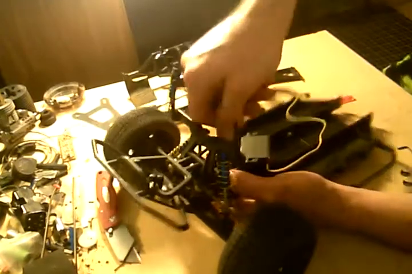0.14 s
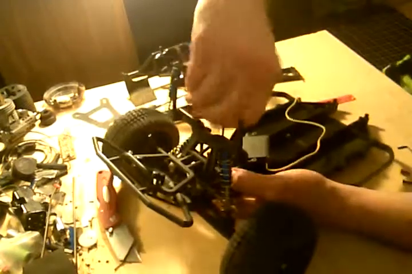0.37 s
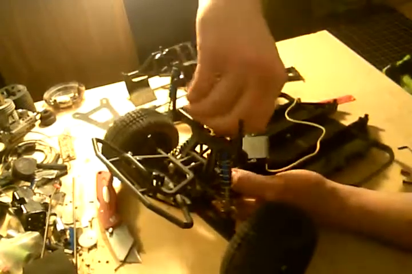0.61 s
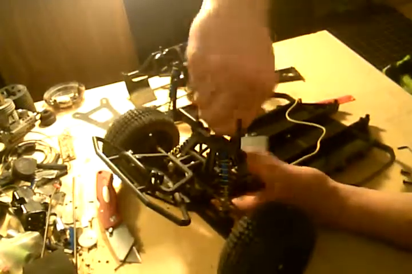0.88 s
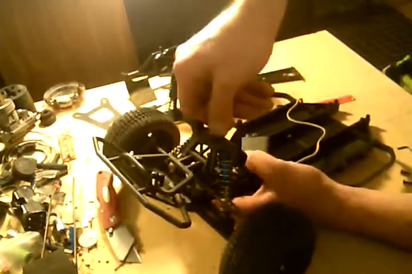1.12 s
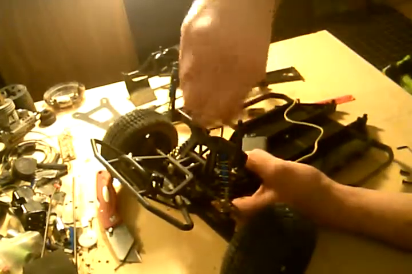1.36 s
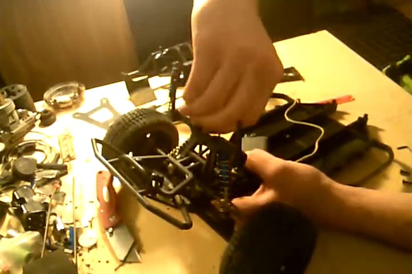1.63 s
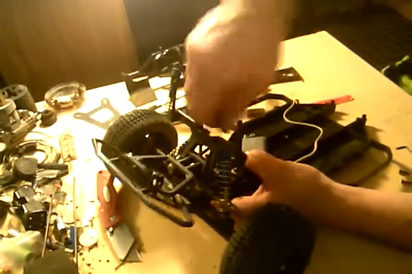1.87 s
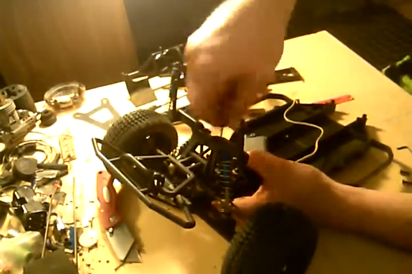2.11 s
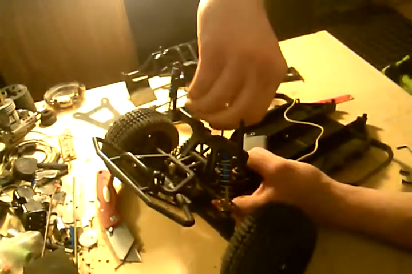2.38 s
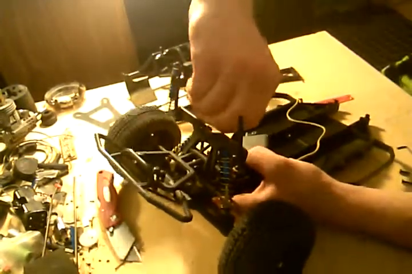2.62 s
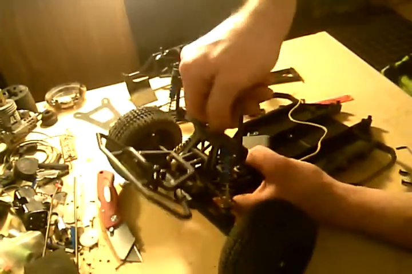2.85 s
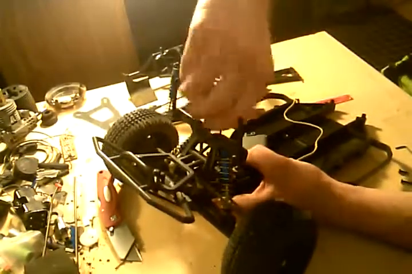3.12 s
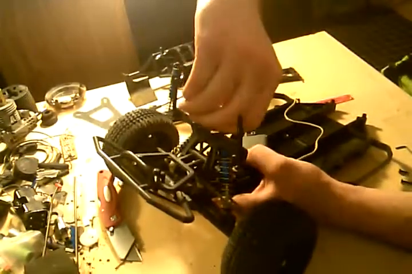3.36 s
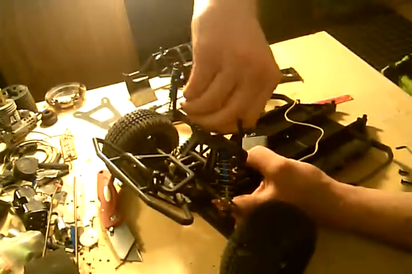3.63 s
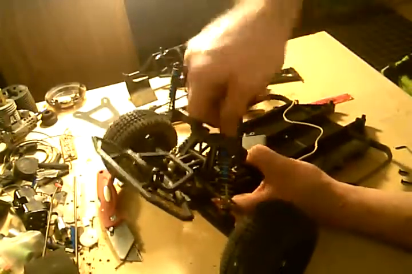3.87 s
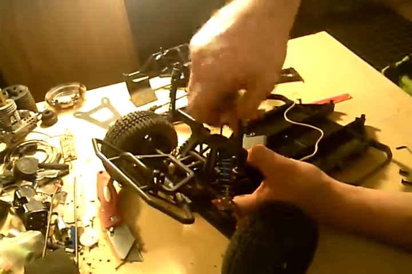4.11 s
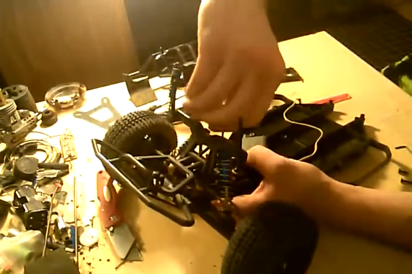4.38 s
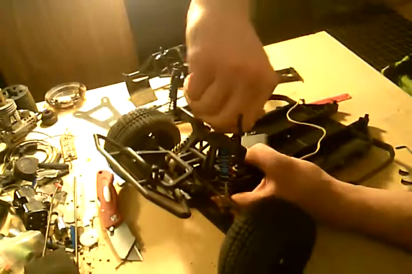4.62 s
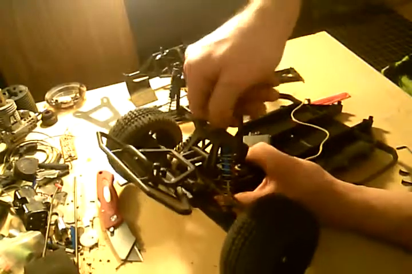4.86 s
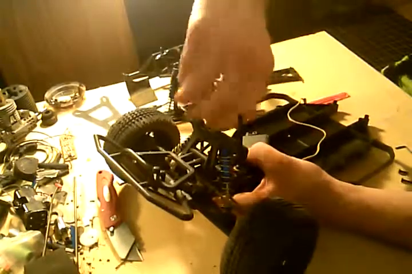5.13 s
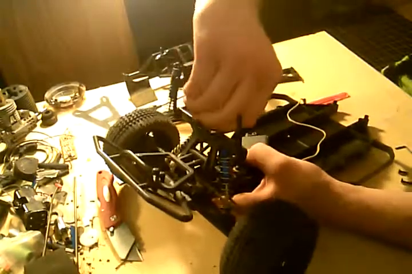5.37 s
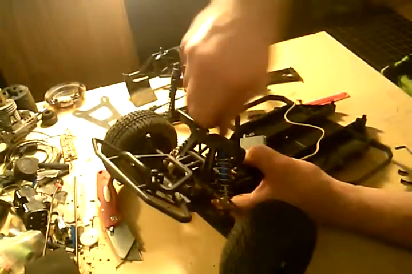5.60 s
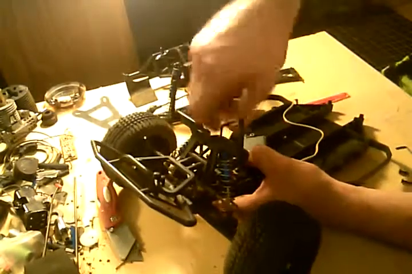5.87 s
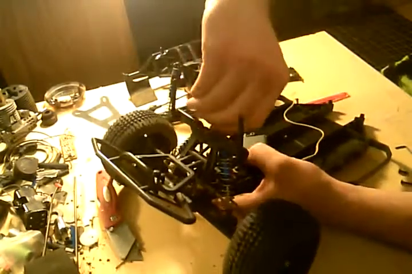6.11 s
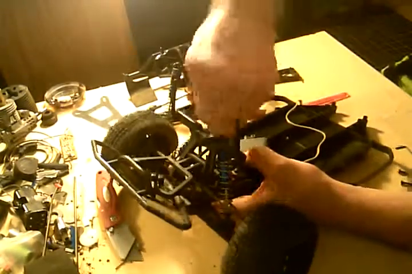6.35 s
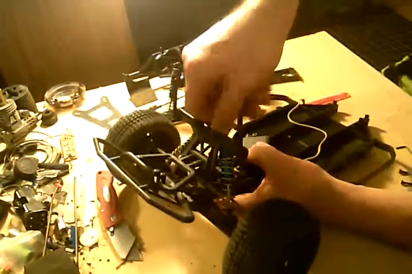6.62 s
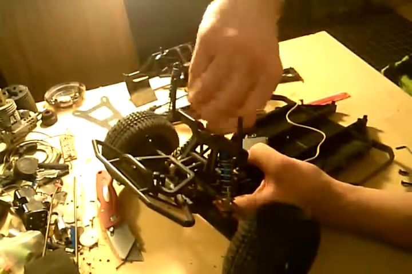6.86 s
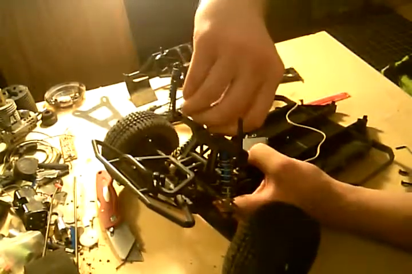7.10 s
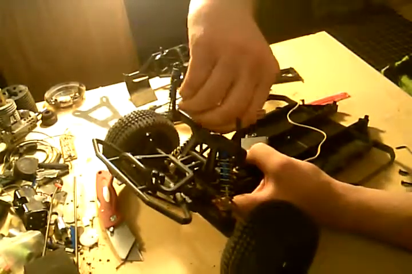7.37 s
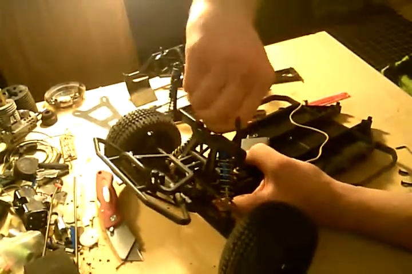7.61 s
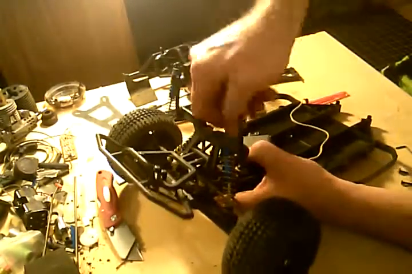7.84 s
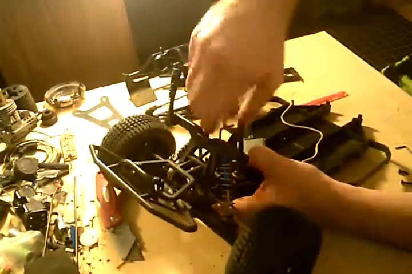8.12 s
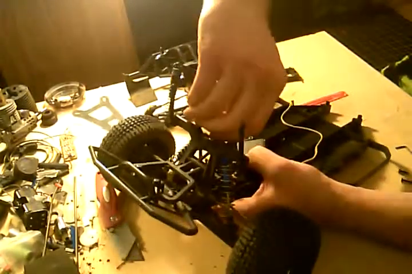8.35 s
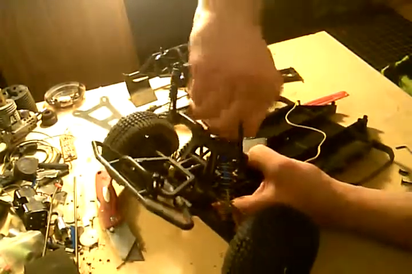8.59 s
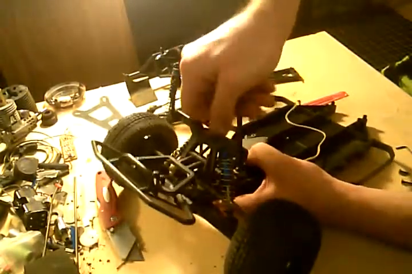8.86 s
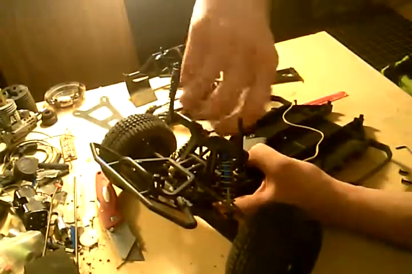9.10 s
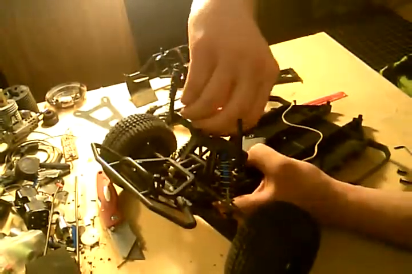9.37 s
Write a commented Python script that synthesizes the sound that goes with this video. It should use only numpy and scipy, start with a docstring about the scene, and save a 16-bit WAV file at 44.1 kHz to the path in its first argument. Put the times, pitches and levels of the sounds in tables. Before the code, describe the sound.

Close indoor sound of a screw being driven into a plastic chassis on a wooden bench. Soft contacts at the start lead to a loud hard clack at 0.27 s with a quick rattle. A small snap follows at 0.9, then a sharp bright one at 1.8, with hollow knocks near 2.0 and 2.15. More snaps and clacks fall around 2.65 and 2.9-3.0. Strong snaps come at 3.8, 4.7, 5.6, 6.3, 7.6 and 8.6 s, most followed by a brief dry stick-slip creak, clearest at 5.6, 7.8 and 8.7. Between them come regrip ticks, plastic rattles, shuffling and faint skin rustle, with low bench thumps near 4.1, 6.5 and 8.8. Barely audible squeaks pass by. A dense clatter occurs at 7.7-8.2. After 9 s only small clicks remain. The room tail is short; faint hiss drops in the pauses.

```python
"""Screwdriver in a plastic chassis

A hand turns a screwdriver into the plastic chassis of a model car on a wooden bench in a small room.
Snaps, knocks and ticks ring modes of chassis, tip and bench; stick-slip trains make the creak and shuffle.
Narrow resonances squeak, bright grains rustle as fingers slide, and pressing hands hum and sway the bench.
The microphone is close, on a stand; its noise gate turns the hiss down between moves."""
import sys
import numpy as np
from scipy import signal
from scipy.fft import rfft, irfft
from scipy.io import wavfile
from scipy.ndimage import uniform_filter1d

SR = 44100
rng = np.random.default_rng(int(sys.argv[2]) if len(sys.argv) > 2 else 0)


def voltage_ratio(decibels):
    """Convert decibels (scalar or array-like) to amplitude ratios, 20 dB per decade."""
    exponent = np.asarray(decibels, float) / 20
    return 10 ** exponent


def transcribe(u):
    """Save the signal u as a 16-bit wav file named by the first command-line argument.

    u: samples, shape (n,) or (channels, n), limited to [-1, 1]; the rate is SR.
    q: integer samples, one column per channel.
    """
    v = np.clip(np.atleast_2d(u).T, -1, 1)
    q = np.round(v * 32767).astype(np.int16)
    wavfile.write(sys.argv[1], SR, q)


N = 418068


def rms_one(x):
    """Scale to rms 1."""
    return x / np.sqrt(np.mean(x ** 2) + 1e-20)


def at_hz(points, hz):
    """Read a (Hz, value) table on a log-frequency axis."""
    table_hz, value = np.transpose(points)
    return np.interp(np.log(hz), np.log(table_hz), value)


def colour(x, spectrum):
    """Shape a steady noise by a spectrum in dB."""
    hz = np.maximum(np.fft.rfftfreq(len(x), 1 / SR), 1)
    return irfft(rfft(x) * voltage_ratio(at_hz(spectrum, hz)), len(x))


def resonate(x, hz, width_hz):
    """Two-pole resonance; a unit click rings with height about 1."""
    radius = np.exp(-np.pi * width_hz / SR)
    angle = 2 * np.pi * hz / SR
    return signal.lfilter([0, np.sin(angle)], [1, -2 * radius * np.cos(angle), radius ** 2], x + 1e-18)


def body(x, modes):
    """All modes of one object in parallel, signs alternating."""
    return sum((-1) ** k * voltage_ratio(db) * resonate(x, hz, width) for k, (hz, width, db) in enumerate(modes))


def swell(t, start, end, ramp_s):
    """Straight rise to 1 and fall back to 0 inside one event."""
    return np.clip(np.minimum(t - start, end - t) / ramp_s, 0, 1)


def strike(s, modes, peak_db, tilt_db, knee_hz, crest_db, rise_s, contact_s, spread_db):
    """Each knock is a chatter of contacts that drives every mode with a strength of its own."""
    t = np.arange(8192) / SR
    shape = (len(s), len(t))
    chatter = rng.standard_normal(shape) * voltage_ratio(5.4 * rng.standard_normal(shape))
    hardest_first = np.exp(-t / contact_s) + 1.3 * np.exp(-t / (3 * rise_s))
    chatter *= hardest_first * -np.expm1(-t / rise_s)
    # hard blows are short and leave the lowest modes weaker (dB per octave)
    thin_db = 0.3 * np.maximum(peak_db + 33.5, 0)
    luck_db = rng.normal(0, spread_db, (len(s), len(modes)))
    rings = np.zeros(shape)
    for k, (hz, width, db) in enumerate(modes):
        octaves = np.log2(hz / knee_hz)
        mode_db = db + luck_db[:, k] + tilt_db * max(octaves, 0) + thin_db * min(octaves + 0.5, 0)
        rings += (-1) ** k * voltage_ratio(mode_db)[:, None] * resonate(chatter, hz, width)
    loudest = np.sqrt(uniform_filter1d(rings ** 2, size=200, axis=1).max(axis=1))  # over about 5 ms
    rings *= (voltage_ratio(peak_db - crest_db) / loudest)[:, None]
    at = (s[:, None] * SR).astype(int) + np.arange(len(t))
    return np.bincount(at.ravel(), rings.ravel(), N + len(t))[:N]


# The tip snaps into the screw head.
# Each row: start in seconds, then peaks in dB of tip, chassis and bench.
SNAP_EVENTS = [(0.911, -18.5, -38, -27), (0.926, -28, -24.5, -30.5), (1.827, -11.5, -22.5, -17.5),
               (2.635, -18, -27, -24), (3.775, -7.5, -28, -19), (4.666, -8.5, -22.5, -20.5),
               (4.887, -31.5, -38, -39), (4.943, -27, -25.5, -29.5), (5.013, -41, -42, -46),
               (5.579, -8.5, -24, -21), (5.944, -35, -36, -30), (6.328, -7, -21, -26.5),
               (6.514, -26.5, -31, -37), (6.559, -24, -16, -31), (7.593, -7.5, -25, -20),
               (7.638, -22.5, -26.5, -20.5), (7.703, -18, -22.5, -21), (8.637, -5.5, -19.5, -23.5),
               (8.839, -34, -26.5, -37), (9.256, -31, -46.5, -51)]
# Parts knock together. Each row: start in seconds, chassis peak in dB,
# slope of the upper chassis modes in dB per octave, tip peak in dB, bench peak in dB.
KNOCK_EVENTS = [(0.065, -41.5, 7.5, -61, -33.5), (.15, -42, 1, -38, -42.5), (.271, -4, 5, -12, -14),
                (.296, -14, -2, -37, -23), (.31, -21, -3.5, -24, -21.5), (1.004, -39.5, -18, -58, -40.5),
                (1.058, -29.5, -6, -32, -30.5), (1.281, -38, -33, -71, -49),
                (1.355, -39.5, -18, -49, -41.5), (1.583, -51.5, -27, -68.5, -46),
                (1.721, -63, 3.5, -58, -47.5), (1.973, -13, -0.5, -29.5, -25), (2.147, -18, -2, -34.5, -25),
                (2.23, -40, 18, -43, -43), (2.517, -70.5, -5, -71, -40), (2.655, -18.5, -0.5, -31, -29),
                (2.893, -30, -16, -32, -23.5), (2.909, -18, -4, -26.5, -22.5),
                (2.983, -15, -10.5, -38, -23), (3.072, -22, -3, -64, -30.5),
                (3.738, -28.5, -15.5, -61, -33.5), (3.792, -15, -20, -30, -21.5),
                (3.981, -26.5, -41, -58, -34), (4.03, -32, 6, -53, -32), (4.044, -15.5, -3, -55, -25.5),
                (4.129, -18, -7, -32.5, -17.5), (4.218, -39.5, 11.5, -43.5, -48),
                (4.573, -55.5, 1.5, -71.5, -37), (4.78, -24, -24, -39.5, -33),
                (4.861, -14.5, -9.5, -41, -22.5), (5.065, -37, -21, -49, -39),
                (5.147, -50.5, -16, -64.5, -47.5), (5.688, -23, -17, -32.5, -24.5),
                (5.737, -13, -3.8, -28.5, -27), (5.788, -29, -3, -55, -30.5), (5.871, -25.5, -13, -55, -41),
                (5.95, -22.5, 3, -46, -27), (6.06, -44, -19, -68, -51), (6.153, -33.5, -18, -80, -37),
                (6.49, -26.5, -26, -56, -20.5), (6.536, -21.5, -11, -29.5, -18.5),
                (6.64, -33.5, 1, -41, -26), (6.86, -40.5, -29, -60, -22), (7.211, -42, -17, -61.5, -40.5),
                (7.265, -28.5, -8.5, -63, -39), (7.309, -32.5, -11, -62, -32.5),
                (7.515, -49.5, -10, -67, -61), (7.731, -29, 4.5, -24, -29), (7.756, -23, -1, -25, -22.5),
                (7.777, -25, -3, -30, -46), (7.795, -22, 11, -29, -28), (7.812, -23, 10.5, -24, -28),
                (7.954, -25.5, -21, -60, -31), (8.045, -18.5, -1.5, -62, -38),
                (8.145, -29.5, -29, -58, -24), (8.174, -29.5, -3, -34, -20), (8.198, -21.5, 2, -42, -34),
                (8.209, -14.5, 5.5, -31, -25), (8.537, -50.5, -12, -74, -56),
                (8.591, -28.5, -3.5, -54, -34), (8.607, -27.5, -3, -45, -39.5),
                (8.787, -21.5, -39, -60, -17.5), (8.863, -47, 13, -43, -53), (8.905, -34, -25, -49, -37),
                (8.949, -51, -11, -52, -56), (9.055, -47.5, -14.5, -61, -39),
                (9.145, -53, -24, -65.5, -49.5), (9.301, -52, 6.5, -38.5, -61.5)]
# Thin bright ticks as the fingers leave and catch the handle. Each row: start in seconds, tip peak in dB.
TICK_EVENTS = [(.128, -49), (1.081, -44), (1.946, -42), (2.179, -36.5), (2.808, -40.5), (2.982, -34),
               (3.945, -40), (4.145, -34), (4.824, -36.5), (5.72, -32.5), (6.846, -44), (8.09, -39),
               (8.789, -49), (8.823, -34)]
# Modes of the plastic chassis. Each row: frequency in Hz, width in Hz, level in dB.
CHASSIS_MODES = [(399.6, 69, -1.5), (479.4, 40, 1), (633, 47, -2), (641.3, 37, -1.5), (850, 21, -3),
                 (856, 36, -4.5), (1015, 54, 3), (1037, 38, -3.5), (1155, 67, 1.5), (1342.4, 76, -3),
                 (1383, 82, -0.5), (1437, 260, 1), (1663, 94, -5), (1795, 100, 0), (1930, 750, -1.5),
                 (2085, 310, -4.5), (2363, 250, 4), (2527, 150, -2.5), (2680, 180, -4), (2833, 280, 3),
                 (3800, 800, -8), (4100, 2100, -21)]
# Well damped modes of the tip gripped in the screw head. Each row: frequency in Hz, width in Hz, level in dB.
TIP_MODES = [(1150, 300, -12.5), (2257, 900, -8), (3404, 220, -8.5), (4160, 480, -1), (4580, 550, 0.5),
             (4700, 990, -4), (4780, 400, -6.5), (5700, 1100, -0.5), (7040, 910, 0), (8070, 1000, 0),
             (9500, 1400, 1.5), (10000, 900, -1.5), (12230, 890, -4.5), (14400, 1300, -18.5)]
# Modes of the wooden bench top. Each row: frequency in Hz, width in Hz, level in dB.
BENCH_MODES = [(120, 12, -5.5), (162.35, 11, 7.5), (205, 13, -7), (247.4, 19, -4)]


def knocks():
    """Chassis, tip and bench top ring together at every snap, knock and tick."""
    # upper modes rise or fall by the given slopes (dB per octave)
    rows = [(s, chassis, -3.5, tip, -2, top) for s, tip, chassis, top in SNAP_EVENTS]
    rows += [(s, chassis, slope, tip, -14, top) for s, chassis, slope, tip, top in KNOCK_EVENTS]
    rows += [(s, db - 1, -14, db, 11.5, db + 0.5) for s, db in TICK_EVENTS]
    s, chassis_db, chassis_slope, tip_db, tip_slope, bench_db = np.transpose(rows)
    chassis = strike(s, CHASSIS_MODES, chassis_db, chassis_slope, 1200,
                     crest_db=8, rise_s=0.0004, contact_s=0.005, spread_db=2)
    tip = strike(s, TIP_MODES, tip_db, tip_slope, 2800,
                 crest_db=10.5, rise_s=0.0015, contact_s=0.01, spread_db=0)
    top = strike(s, BENCH_MODES, bench_db, 0, 230,
                 crest_db=5.5, rise_s=0.00041, contact_s=0.0064, spread_db=5.5)
    return chassis, tip, top


def slips(per_s, uneven):
    """A stick-slip train: the rate wanders, each slip has its own size."""
    wobble = uneven * rms_one(uniform_filter1d(rng.standard_normal(N), size=600))
    cycles = np.cumsum(per_s * np.exp(wobble) / SR)
    train = np.diff(np.floor(cycles), prepend=0)
    return train * voltage_ratio(3 * rng.standard_normal(N))


# The screw turns under load after the tip has seated.
# Each row: start in seconds, end in seconds, creak level in dB, slips per second.
SCREW_TURNS = [(0.944, 1.044, -68, 170), (1.85, 1.947, -50.5, 170), (2.665, 2.781, -60.5, 170),
               (3.81, 3.962, -50.5, 170), (4.686, 4.788, -46, 150), (5.596, 5.73, -33.5, 170),
               (6.349, 6.472, -46, 170), (7.74, 7.93, -33, 92), (8.658, 8.792, -35.5, 170)]


def creak():
    """The thread sticks and slips while the screw turns; the chassis rings, the tip scrapes faintly."""
    t = np.arange(N) / SR
    gain, per_s = np.zeros(N), np.full(N, 100.)
    for start, end, db, rate in SCREW_TURNS:
        gain += voltage_ratio(db) * swell(t, start, end, 0.049)
        per_s[(t > start) & (t < end)] = rate
    force = slips(per_s, uneven=0.15) / np.sqrt(per_s)
    ring = rms_one(body(force, CHASSIS_MODES[6:9]))
    ring += voltage_ratio(-11) * rms_one(body(force, CHASSIS_MODES[9:]))
    ring += voltage_ratio(-15) * rms_one(body(force, TIP_MODES[1:9]))
    return gain * ring


def shuffle(shuffle_db, scrape_db):
    """Parts shift in the grip: small slips over steady rubbing ring the chassis and the tip."""
    force = slips(160, uneven=0.5)  # slips per second
    rub = rng.standard_normal(N)
    out = voltage_ratio(shuffle_db) * rms_one(body(force + 0.021 * rub, CHASSIS_MODES))
    return out + voltage_ratio(scrape_db) * rms_one(body(force + 0.12 * rub, TIP_MODES[:9]))


# Faint squeaks of plastic on plastic.
# Each row: start in seconds, end in seconds, pitch in Hz, level in dB.
PLASTIC_SQUEAKS = [(2.27, 2.44, 804, -70.5), (5.14, 5.25, 765, -63), (5.529, 5.575, 1055, -58),
                   (6.29, 6.325, 1047, -55.5)]


def squeaks():
    """Light rubbing excites one narrow resonance for a moment."""
    t, rub = np.arange(N) / SR, rng.standard_normal(N)
    out = np.zeros(N)
    for start, end, hz, db in PLASTIC_SQUEAKS:
        tone = rms_one(resonate(resonate(rub, hz, 45), hz, 45))
        out += voltage_ratio(db) * swell(t, start, end, 0.022) * tone
    return out


# Spectrum of skin sliding on the handle. Each row: frequency in Hz, relative level in dB.
RUSTLE_SPECTRUM = [(3000, -23), (5000, -19.5), (7000, -2), (10000, 0), (13000, -7.5), (15500, -12)]


def rustle(level_db):
    """Skin slides on the handle: fine bright grains."""
    grains = rng.standard_normal(N) * voltage_ratio(3 * np.minimum(rng.exponential(1, N), 5))
    return voltage_ratio(level_db) * rms_one(colour(grains, RUSTLE_SPECTRUM))


# Pushes of the hands into the bench. Each row: start in seconds, peak in dB, sway frequency in Hz.
BENCH_PUSHES = [(0.162, -26.5, 29.86), (.272, -26, 70.7), (0.951, -36.5, 27), (1.126, -37, 27.6),
                (1.851, -33.5, 40.9), (2.138, -48, 24), (2.144, -22, 34), (2.511, -40, 22.9),
                (2.9, -24.5, 32.4), (3.788, -33.5, 60.1), (4.129, -25.5, 23.5), (4.13, -20, 52.1),
                (4.677, -28, 26.9), (4.941, -27, 35), (5.59, -28, 24.2), (6.129, -33, 27.47),
                (6.319, -28.5, 29.6), (6.541, -20, 59), (6.919, -36.5, 25.6), (7.291, -30, 27.7),
                (7.632, -25, 24.6), (7.784, -57, 48.4), (8.066, -46, 59), (8.071, -24, 42),
                (8.647, -30.5, 24.4), (8.84, -21.5, 41.3), (9.131, -41, 27.7)]


def bench(hum_db, sway_db):
    """Hand pressure shakes the bench top and rocks the legs; pushes set off a damped sway."""
    top_shake, leg_shake = rng.standard_normal((2, N))
    out = voltage_ratio(hum_db) * rms_one(body(top_shake, BENCH_MODES))
    out += voltage_ratio(sway_db) * rms_one(resonate(leg_shake, 34, 20) + 1.8 * resonate(leg_shake, 85, 60))
    t = np.arange(SR // 2) / SR
    sides = rng.choice([-1, 1], len(BENCH_PUSHES))
    for (s, db, hz), side in zip(BENCH_PUSHES, sides):
        at = int(s * SR)
        sway = np.sin(2 * np.pi * hz * t) * np.exp(-t / 0.032) * -np.expm1(-t / 0.0082)
        out[at:at + len(t)] += (side * voltage_ratio(db + 8.5) * sway)[:N - at]  # 8.5 dB makes up for the envelope
    return out


# Moves of the hands. Each row: start in seconds, end in seconds, then levels in dB of
# shuffle, bench hum and finger slide.
HAND_MOVES = [(0.064, 0.142, -54.5, -56, -66), (0.164, 0.184, -52.5, -50, -52), (.2, .27, -58, -61, -65.5),
              (0.728, .9, -81, -72.5, -89), (0.986, 1.202, -62, -58, -66), (1.293, 1.37, -64, -70.5, -73),
              (1.582, 1.623, -75.5, -71, -87.5), (1.737, 1.819, -71.5, -61.5, -82),
              (1.87, 2.052, -60.5, -42, -68.5), (2.12, 2.312, -60, -49.5, -67.5),
              (2.639, 2.832, -65, -51.5, -62), (2.884, 3.038, -55.5, -52.5, -64),
              (3.257, 3.419, -81, -70.5, -83.5), (3.852, 3.99, -57.5, -38, -67),
              (4.003, 4.203, -55.5, -43.5, -69), (4.56, 4.66, -63, -67, -75),
              (4.697, 4.86, -52.5, -37, -61), (4.901, 5.071, -58.5, -51, -69.5),
              (5.535, 5.583, -64.5, -61.5, -88.5), (5.638, 5.72, -52, -36, -63),
              (5.804, 5.97, -49.5, -42.5, -66.5), (6.3, 6.33, -58, -54, -80),
              (6.337, 6.45, -45.5, -41, -59.5), (6.476, 6.616, -47, -37.5, -56.5),
              (6.865, 6.937, -59.5, -46.5, -62.5), (6.97, 7.164, -71, -61, -73.5),
              (7.258, 7.356, -70, -61, -78), (7.41, 7.44, -70.5, -61.5, -75.5),
              (7.713, 7.854, -47, -34.5, -62), (7.928, 8.204, -53, -43.5, -67.5),
              (8.474, 8.59, -69, -67.5, -100.5), (8.643, 8.753, -38, -34.5, -61),
              (8.805, 8.985, -56, -51, -68.5), (9.438, 9.5, -69, -60, -86)]
# Hands at rest. One row: levels in dB of shuffle, bench hum, sway and finger slide.
HANDS_AT_REST = (-88, -72, -63.5, -84)


def hands():
    """Levels of shuffle, hum, sway and slide: each move swells, holds unsteadily and dies back to rest."""
    attack_db_s, release_db_s = 596, 248
    unsteady_db, unsteady_s = 5, 0.03  # the hands never press evenly
    t = np.arange(N) / SR
    levels = np.outer(HANDS_AT_REST, np.ones(N))
    for start, end, shuffle_db, hum_db, slide_db in HAND_MOVES:
        shape_db = -attack_db_s * np.maximum(start - t, 0) - release_db_s * np.maximum(t - end, 0)
        sway_db = -43 + 0.48 * (hum_db + 49)  # sway follows about half of the hum's swing
        levels = np.maximum(levels, np.add.outer([shuffle_db, hum_db, sway_db, slide_db], shape_db))
    steps = np.arange(0, t[-1] / unsteady_s + 1)
    wander = rng.standard_normal((4, len(steps)))
    return levels + unsteady_db * np.array([np.interp(t / unsteady_s, steps, w) for w in wander])


# Decay of the small room. Each row: frequency in Hz, time to fall by 60 dB in seconds.
ROOM_DECAY = [(400, 0.19), (900, 0.15), (2000, 0.21), (5000, .19), (12000, 0.13)]


def room(x):
    """Diffuse tail: the energy in each band lingers as noise that dies at the rate of the room."""
    out = np.zeros(N)
    white = rng.standard_normal((2, N))  # neighbouring bands get unrelated noise
    white += 0.042 * body(white, CHASSIS_MODES[:13])  # reflections carry the modes of the chassis
    build = np.exp(-1 / (0.001 * SR))  # the tail builds up over 1 ms
    edges = np.geomspace(350, 16000, num=18)  # about a third of an octave each
    for k, (low, high) in enumerate(zip(edges, edges[1:])):
        band = signal.butter(2, [low, high], "band", fs=SR, output="sos")
        fall = voltage_ratio(-120 / (at_hz(ROOM_DECAY, low) * SR))  # of energy, per sample
        poles = np.convolve([1, -fall], [1, -build])
        energy = signal.lfilter([(1 - fall) * (1 - build)], poles, signal.sosfilt(band, x) ** 2)
        out += np.sqrt(np.abs(energy)) * rms_one(signal.sosfilt(band, white[k % 2]))
    return out


def scene():
    """Airborne sounds pass through the room; the bench reaches the microphone through its stand."""
    small_part_hz, stand_hz = 345, 292
    shuffle_db, hum_db, sway_db, slide_db = hands()
    chassis, tip, top = knocks()
    air = chassis + tip + creak() + squeaks()
    air += shuffle(shuffle_db, slide_db - 5.5) + rustle(slide_db)
    # small parts radiate no bass
    air = signal.sosfilt(signal.butter(3, small_part_hz, "high", fs=SR, output="sos"), air)
    top = top + bench(hum_db, sway_db)
    top = signal.sosfilt(signal.butter(3, stand_hz, fs=SR, output="sos"), top)
    tail = room(air - 0.4 * chassis)  # part of each chassis knock reaches the microphone through the structure, not the room
    return (air + tail + top)[None]


def band_limit(x):
    """A steep low-pass at the top of the band."""
    return signal.sosfilt(signal.butter(12, 16650, fs=SR, output="sos"), x)


# Spectrum of the preamp hiss. Each row: frequency in Hz, relative level in dB per Hz.
HISS_SPECTRUM = [(18, -39.5), (30, -6.5), (165, -22.5), (355, -31.5), (486, -29.5), (632, -32.5),
                 (1160, -36.5), (4190, -44.5), (8980, -43.5), (16000, -47.5)]


def record(dry):
    """Close microphone with preamp hiss, then a gate that turns the sound down while the level is low."""
    hiss_db, mic_top_hz = -59.5, 15190
    open_db, depth_db, slope, release_db_s = -49, 14.5, 1.49, 247.5  # gate; slope in dB per dB
    x = dry[0] + voltage_ratio(hiss_db) * rms_one(colour(rng.standard_normal(N), HISS_SPECTRUM))
    x = signal.sosfilt(signal.butter(6, mic_top_hz, fs=SR, output="sos"), x)
    sensed = signal.sosfilt(signal.butter(1, 45, "high", fs=SR, output="sos"), x)
    level_db = 10 * np.log10(uniform_filter1d(sensed ** 2, size=220) + 1e-12)  # over 5 ms
    # the sensed level rises at once and falls at the release rate
    fall_db = release_db_s * np.arange(N) / SR
    held_db = np.maximum.accumulate(level_db + fall_db) - fall_db
    gain_db = np.clip(slope * (held_db - open_db), -depth_db, 0)
    gated = x * voltage_ratio(uniform_filter1d(gain_db, size=60))
    return band_limit(gated[None])


dry = scene()
out = record(dry)
transcribe(out)
```